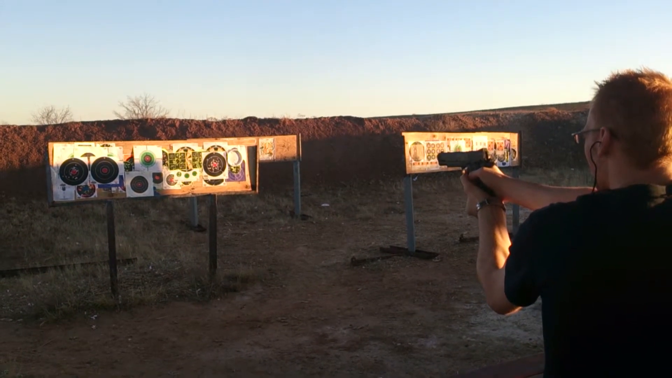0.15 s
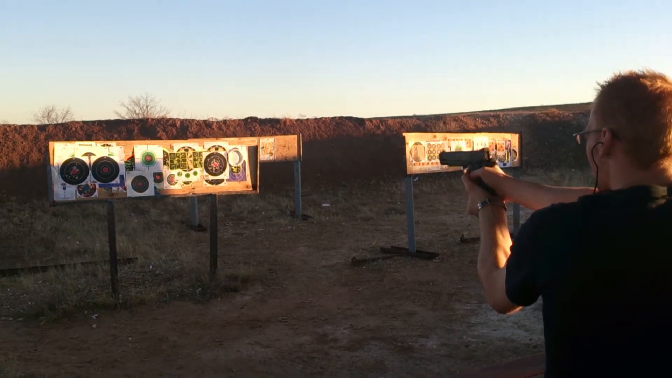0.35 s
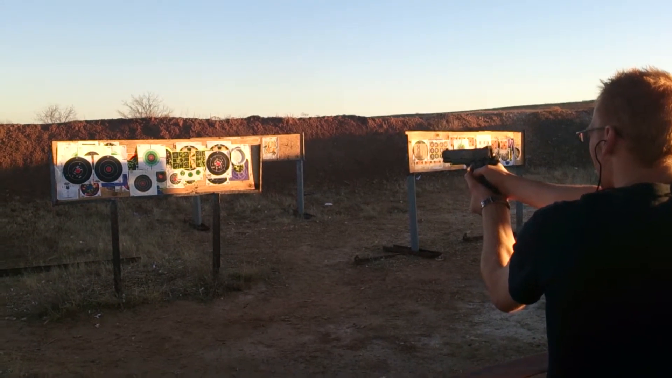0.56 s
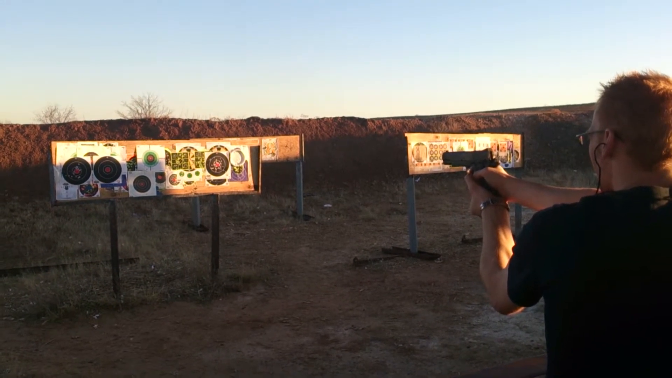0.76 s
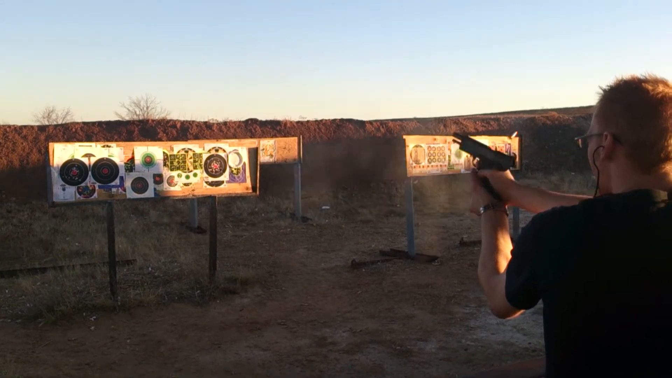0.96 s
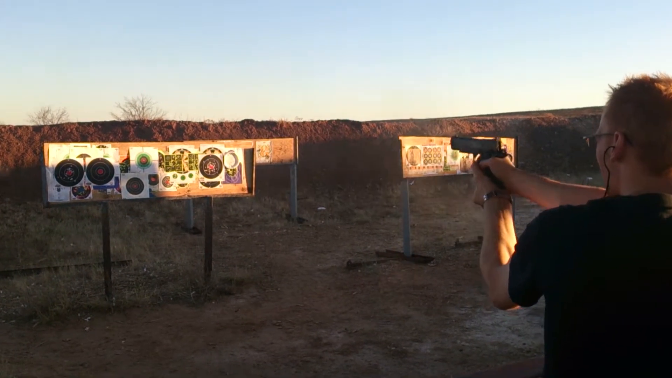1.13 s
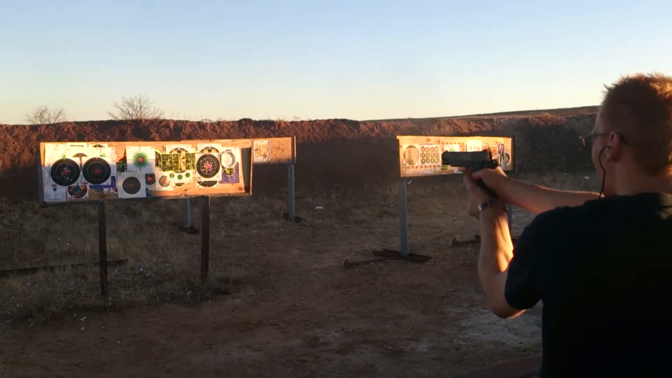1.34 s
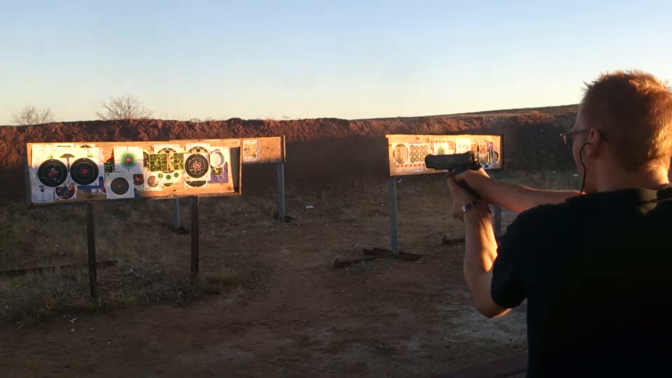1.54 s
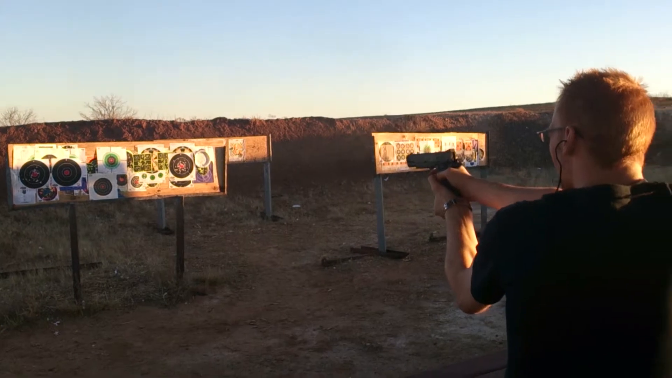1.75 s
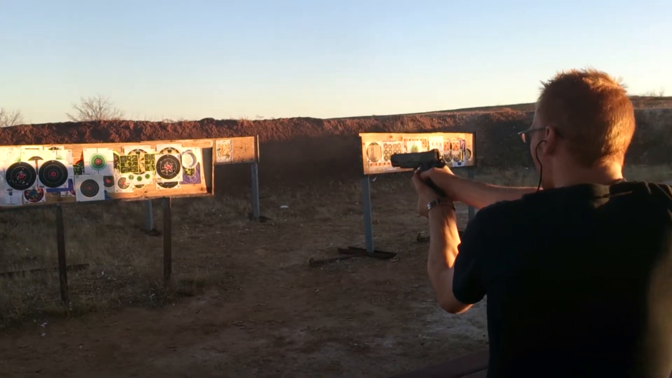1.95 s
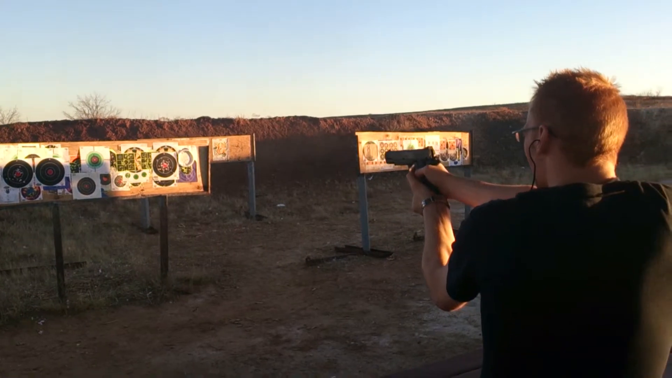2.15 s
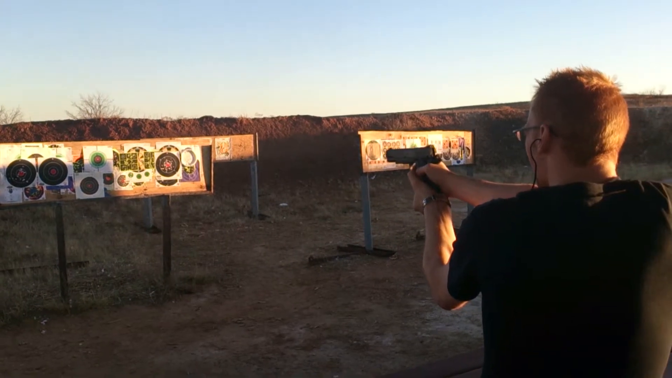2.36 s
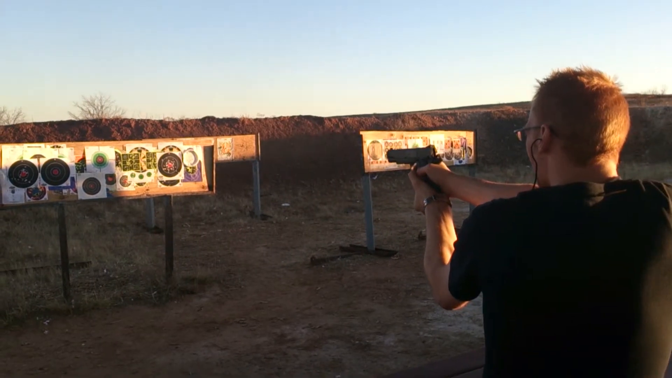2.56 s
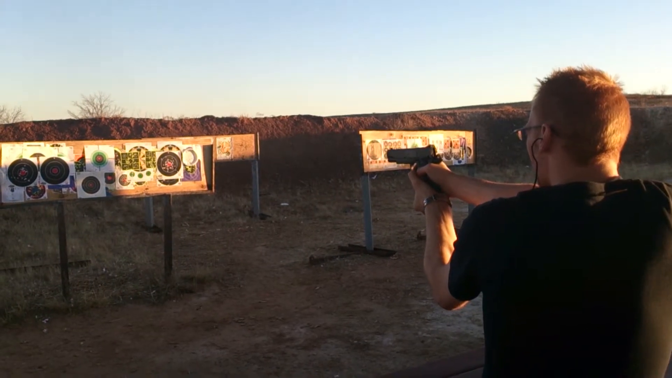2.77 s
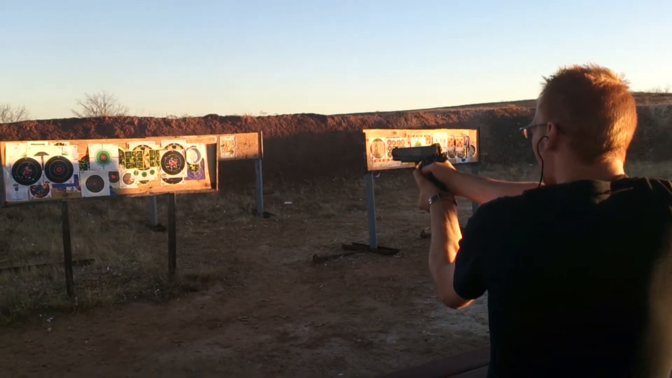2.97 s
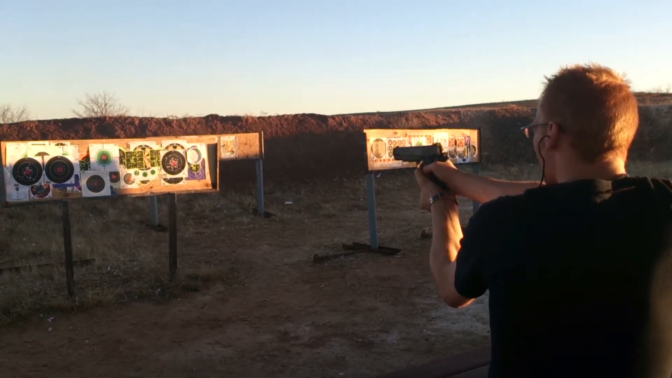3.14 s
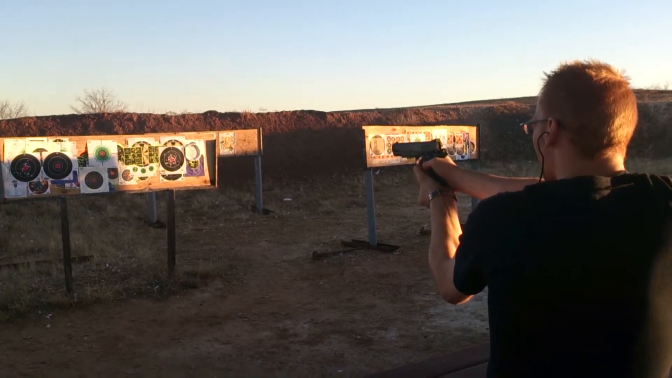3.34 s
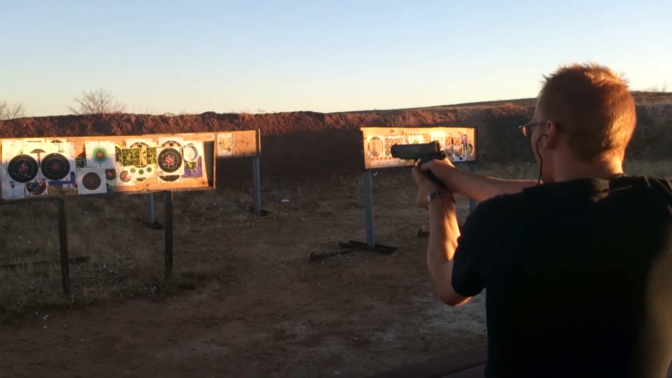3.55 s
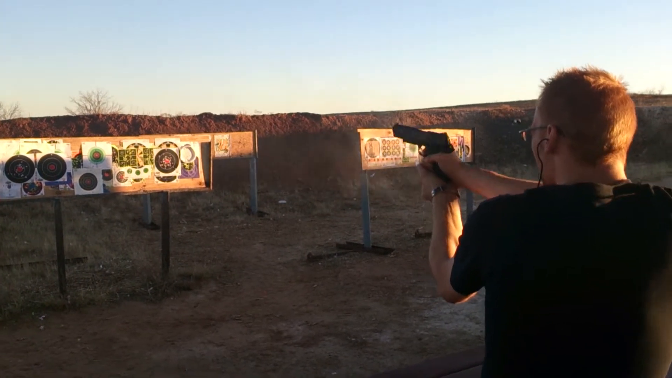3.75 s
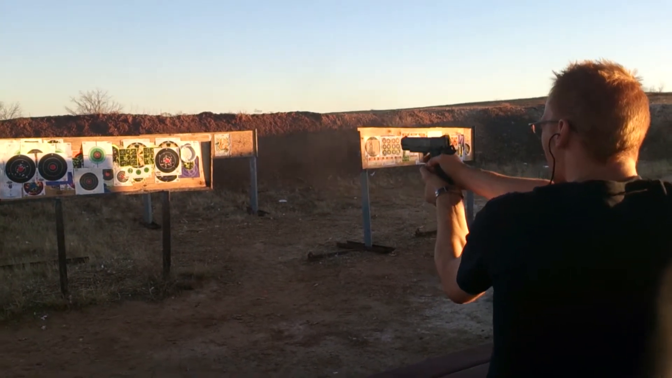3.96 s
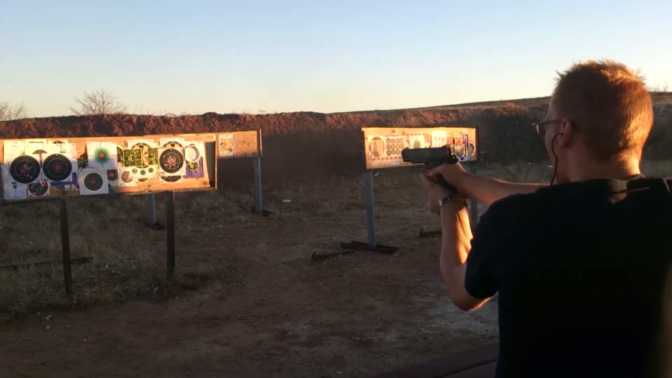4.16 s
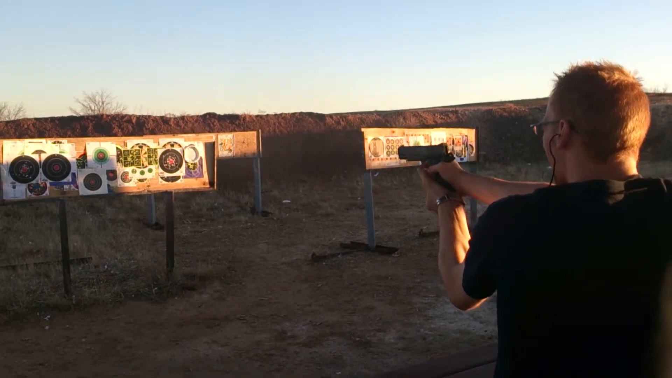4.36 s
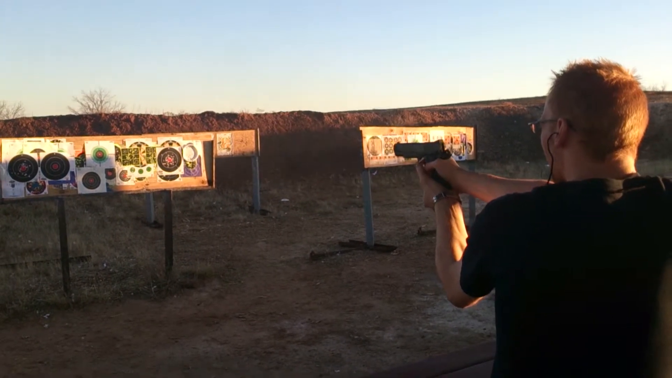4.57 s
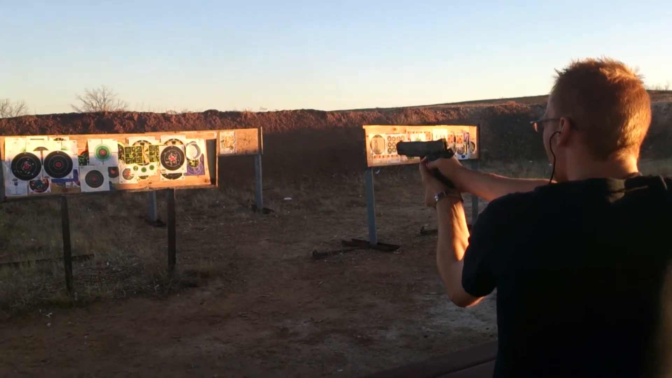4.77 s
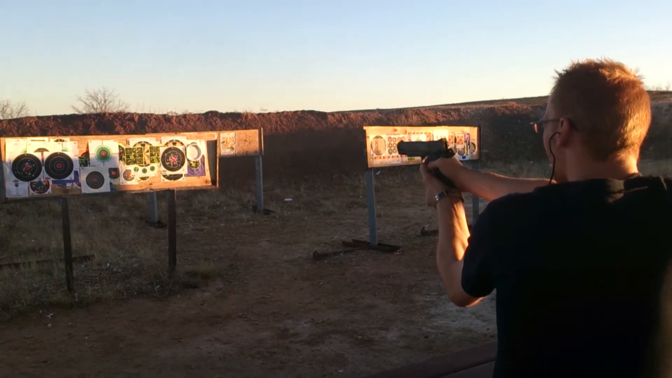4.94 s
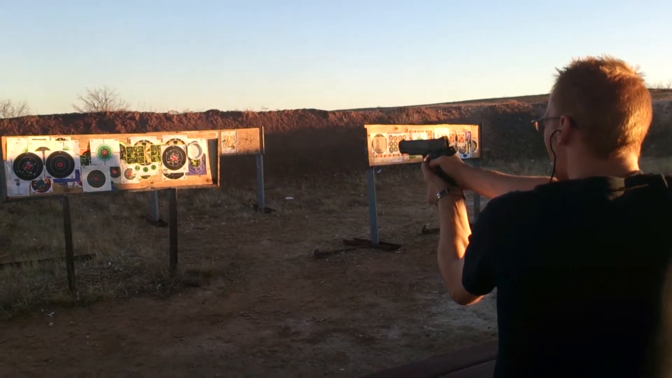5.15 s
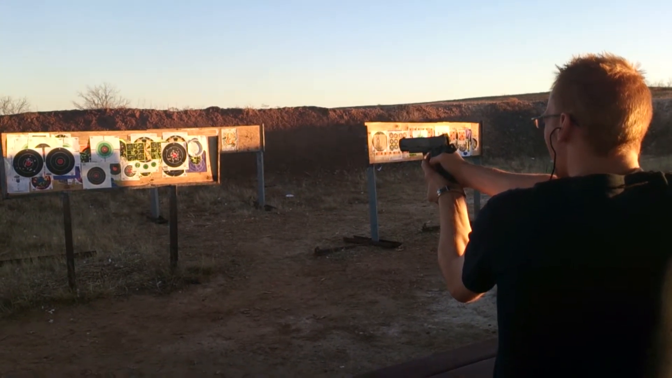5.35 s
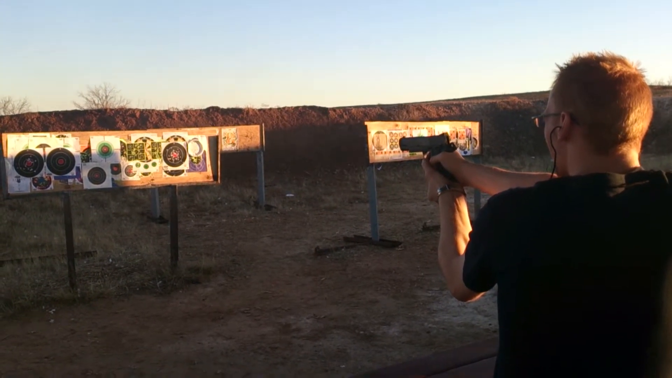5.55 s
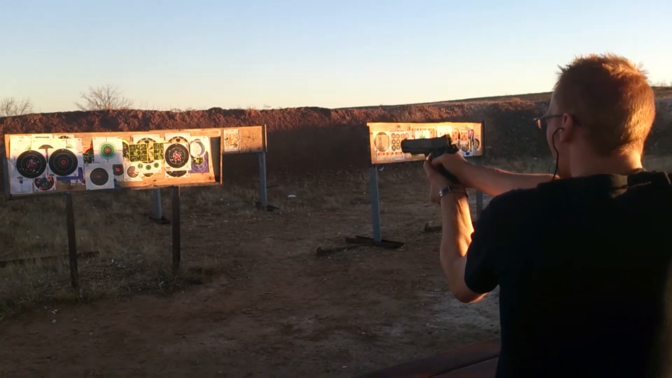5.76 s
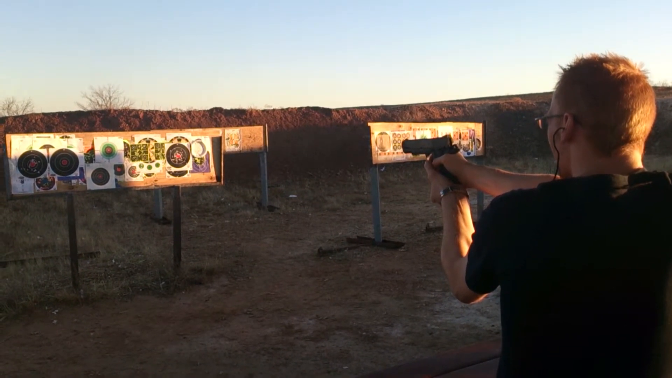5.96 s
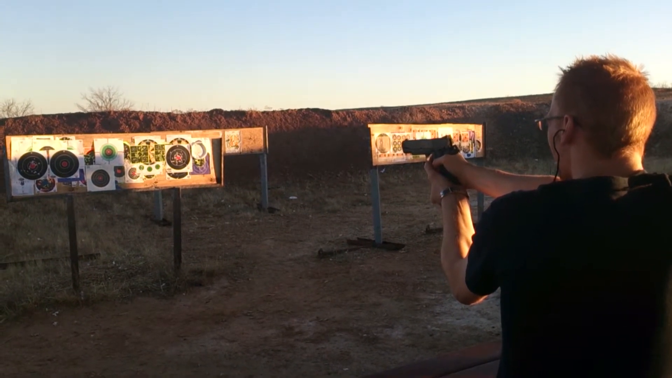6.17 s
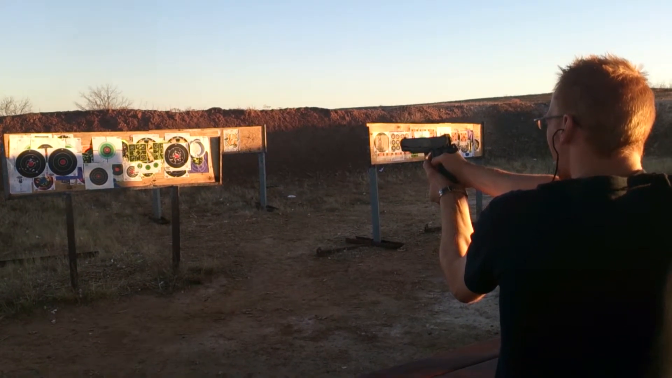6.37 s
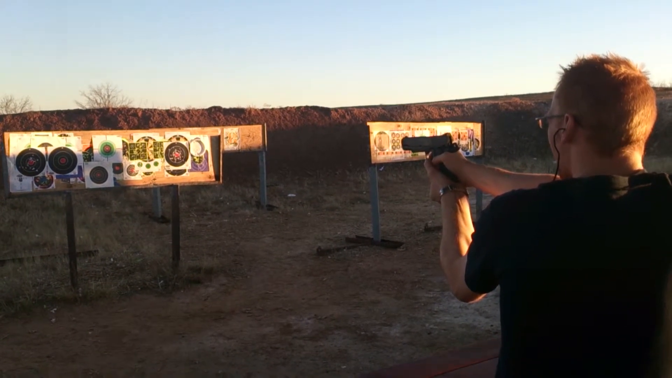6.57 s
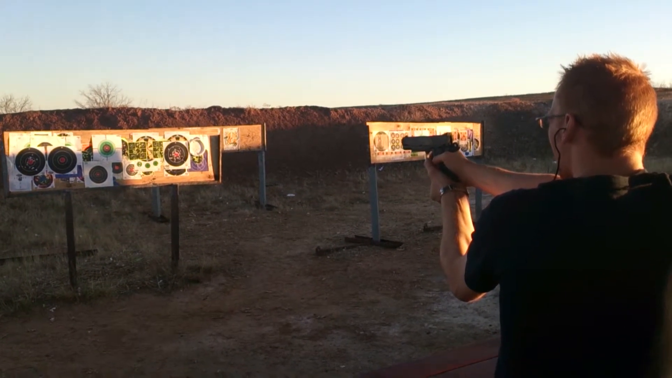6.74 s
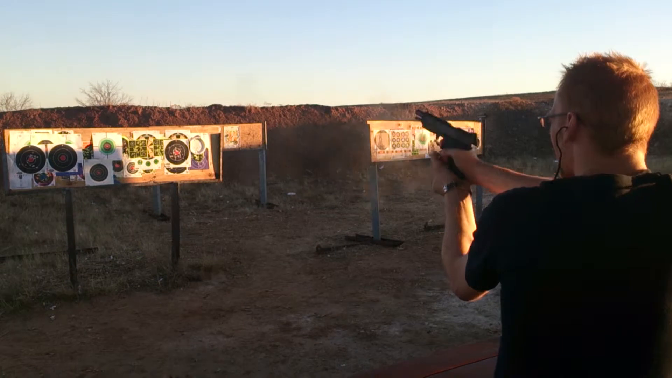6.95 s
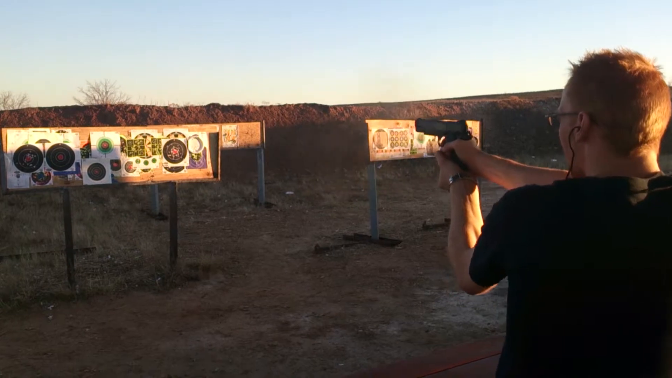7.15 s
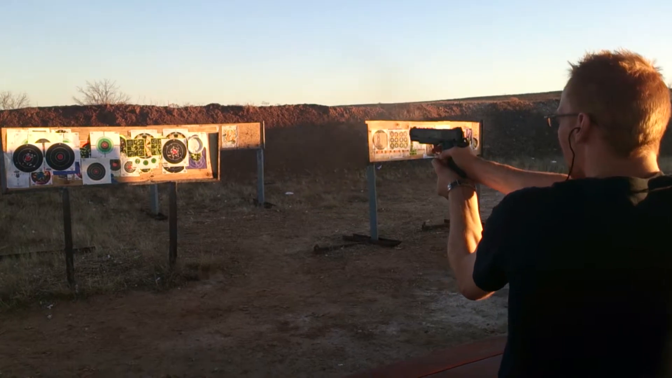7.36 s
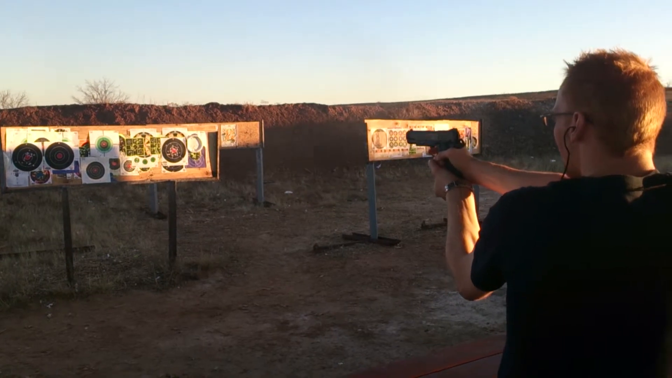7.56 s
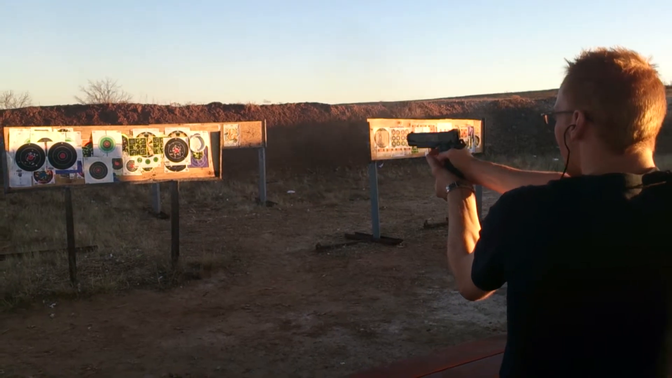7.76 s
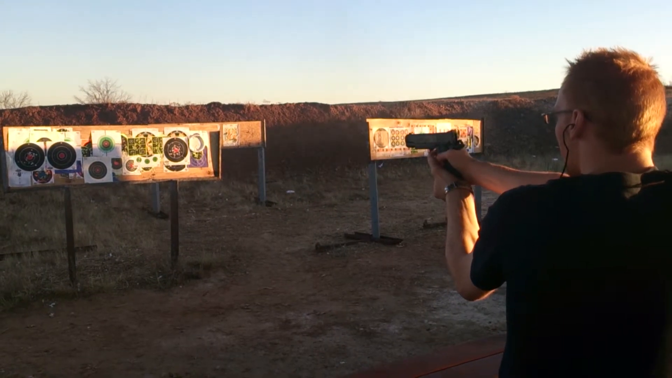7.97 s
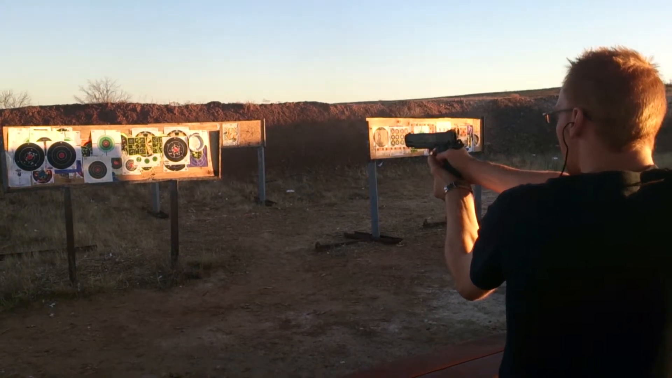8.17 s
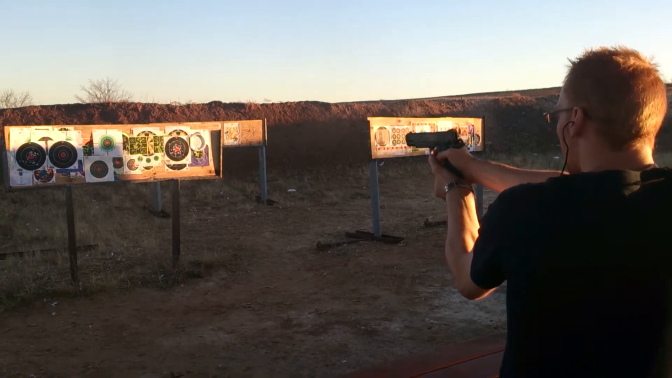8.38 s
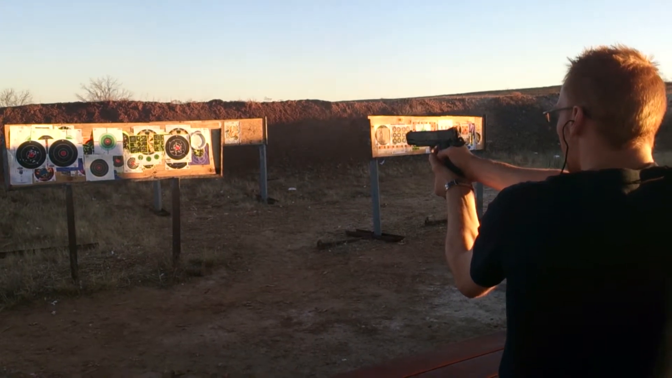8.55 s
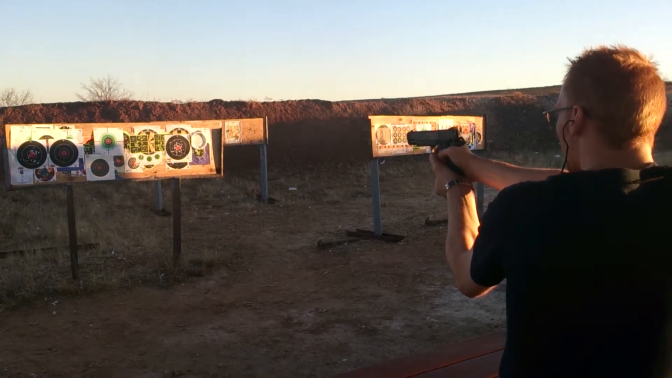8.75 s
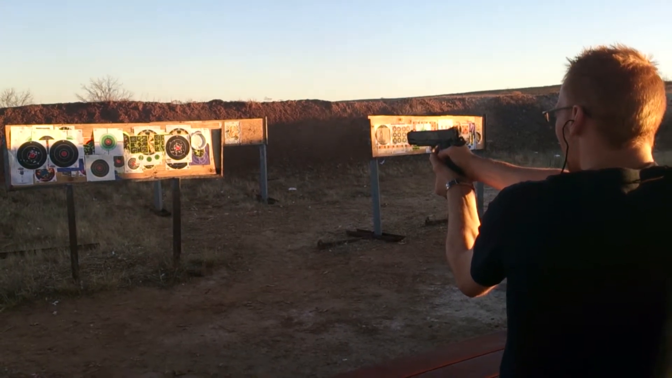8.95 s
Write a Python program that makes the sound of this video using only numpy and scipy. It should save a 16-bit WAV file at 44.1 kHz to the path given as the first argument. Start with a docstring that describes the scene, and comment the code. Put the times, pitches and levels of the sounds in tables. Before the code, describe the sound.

Slow close pistol blasts roll off banks and hills, spent cases tick and ring on hard floor, while fainter shots ping a steel plate.

```python
"""An outdoor shooting range with a roof: three pistol shots overload a phone just behind the shooter.
Each shot is shaped noise with fading tones for the shelter; roof, banks and berms roll it back.
Spent cases tick and ring as they bounce. Down the line a second gun fires four times and rings a steel plate.
Small metal things click, clothes rustle, and the hand on the phone makes small bumps.
The phone's two microphones hiss and are wired in opposite polarity."""
import sys
import numpy as np
from scipy import signal
from scipy.fft import rfft, irfft, next_fast_len
from scipy.io import wavfile

SR = 44100
rng = np.random.default_rng(int(sys.argv[2]) if len(sys.argv) > 2 else 0)


def write(x):
    x = np.atleast_2d(x).T
    wavfile.write(sys.argv[1], SR, np.round(np.clip(x, -1, 1) * 32767).astype(np.int16))


N = 397341  # samples in the whole scene
LENGTH = 110250  # samples in one long sound (2.5 s)
AGE = np.arange(LENGTH) / SR  # seconds since a sound began


def undb(db):
    """Turn decibels into a gain."""
    return 10 ** (np.asarray(db) / 20)


def level(x, db):
    """Set the rms level."""
    return x * undb(db) / np.sqrt(np.mean(x ** 2))


def fade(t60):
    """A smooth fade that falls by 60 dB in t60 seconds."""
    return np.exp(-np.log(1000) * AGE / t60)


def add(out, s, x):
    """Mix a sound in at a time in seconds, cutting what runs past the end."""
    start = max(int(s * SR), 0)
    part = x[..., :out.shape[-1] - start]
    out[:, start:start + part.shape[-1]] += part


def shape(x, gain):
    """Filter by a gain that is a function of frequency."""
    size = next_fast_len(x.shape[-1], True)
    hz = np.maximum(np.fft.rfftfreq(size, 1 / SR), 1)
    return irfft(rfft(x, size) * gain(hz), size)[..., :x.shape[-1]]


def along(hz, points):
    """Read (Hz, value) points on a log-frequency axis."""
    f, value = np.transpose(points)
    return np.interp(np.log(hz), np.log(f), value)


def bell(hz, centre_hz, octaves):
    """A broad resonance with steep skirts."""
    return 1 / (1 + (np.log2(hz / centre_hz) / octaves) ** 2 / 2) ** 2


def wander(rate, size=LENGTH):
    """Straight lines joining random values, `rate` of them a second (at most 200)."""
    steps = np.arange(size) / SR * min(rate, 200)
    return np.interp(steps, np.arange(2000), rng.standard_normal(2000))


SPACING_M = 0.13  # distance between the two microphone ports


def diffuse(size=LENGTH):
    """Noise arriving from all sides at two ports: alike in the bass, unrelated in the treble."""
    likeness = lambda hz: np.sinc(2 * hz * SPACING_M / 343)  # sound travels 343 m/s
    mid = shape(rng.standard_normal(size), lambda hz: np.sqrt(1 + likeness(hz)))
    side = shape(rng.standard_normal(size), lambda hz: np.sqrt(1 - likeness(hz)))
    return np.array([mid + side, mid - side]) / np.sqrt(2)


def decay(noise, table, swell_cycles=0):
    """Fade noise in third-octave bands, each with its own level and t60; a swell is slower in low bands."""
    table, out, age = np.array(table), 0, AGE.astype(np.float32)
    spectrum = rfft(noise.astype(np.float32))
    hz = np.maximum(np.fft.rfftfreq(LENGTH, 1 / SR), 1).astype(np.float32)
    for centre in (25 * 2 ** (np.arange(29) / 3)).tolist():
        # neighbouring bands overlap smoothly
        octaves_away = np.abs(np.log2(hz / centre))
        window = np.cos(np.pi / 2 * np.minimum(3 * octaves_away, 1)) ** 2
        # from level per octave to a gain for white noise
        gain = undb(along(centre, table[:, :2])) * np.sqrt(SR / 2 / centre / np.log(2))
        t60 = along(centre, table[:, ::2])
        envelope = float(gain) * np.exp(-age * float(np.log(1000) / t60))
        if swell_cycles:
            envelope *= 1 - np.exp(-age * float(max(centre, 250) / swell_cycles))
        out = out + irfft(spectrum * window, LENGTH) * envelope
    return out


def modes(rows):
    """Fading pure tones of a ringing body, met at a random phase by each port."""
    turn = rng.uniform(0, 2 * np.pi, (len(rows), 2, 1))
    out = 0
    for (hz, db, t60), phase in zip(rows, turn):
        out = out + undb(db) * fade(t60) * np.sin(2 * np.pi * hz * AGE + phase)
    return out


def tap(centre_hz, octaves, t60, direct_db, size=16384):
    """A sharp contact together with its longer scatter under the roof."""
    noise = level(shape(diffuse(size), lambda hz: bell(hz, centre_hz, octaves)), 0)
    contact = undb(direct_db) * np.exp(-AGE[:size] / 0.012)
    return noise * (contact + fade(t60)[:size])


# the swell and the decay of an echo after 1 s of travel; both grow as the root of the delay
ECHO_SWELL_S, ECHO_T60_S, ECHO_OCTAVES = .03, .62, .68


def echoes(table):
    """Rough surfaces each return a coloured burst; the longer the path, the more it is smeared."""
    out = np.zeros((2, LENGTH))
    for delay, db, centre_hz in table:
        smear = np.sqrt(delay)
        echo = tap(centre_hz, ECHO_OCTAVES, ECHO_T60_S * smear, direct_db=-21.0)
        swell = 1 - np.exp(-AGE[:echo.shape[1]] / (ECHO_SWELL_S * smear))
        add(out, delay, undb(db) * echo * swell)
    return out


# colour of the open air: (frequency [Hz], relative level per hertz [dB])
AIR_COLOUR = [(12, -4), (22, 0.5), (60, -19), (150, -27), (330, -21.5), (520, -25), (750, -33),
              (1400, -34.5), (2200, -42), (5000, -42.5), (8000, -52), (12000, -75.5)]
# colour of the microphone hiss: (frequency [Hz], relative level per hertz [dB])
HISS_COLOUR = [(7000, -25.5), (8800, -21.5), (9800, 0), (11000, -10), (12500, -8), (14500, -4), (15500, -4),
               (16200, -25.5)]


def background():
    """Distant air of unsteady level, a light breeze on the ports, and microphone hiss with a thin whine."""
    air = level(shape(diffuse(N), lambda hz: undb(along(hz, AIR_COLOUR))), -52.5)
    air = air * undb(1.1 * wander(17.0, size=N))
    breeze = shape(rng.standard_normal((2, N)), lambda hz: bell(hz, centre_hz=25, octaves=1.7))
    breeze = level(breeze, -63.5) * undb(2.5 * wander(1.5, size=N))
    hiss = level(shape(rng.standard_normal((2, N)), lambda hz: undb(along(hz, HISS_COLOUR))), -64.0)
    whine = undb(-70.5) * np.sin(2 * np.pi * 9717.5 * np.arange(N) / SR)
    return air + breeze + hiss + whine * np.array([[1], [-1]])


# firmer shifts of the hand at the right port: (time [s], draw level [dB], push level [dB])
HAND_SHIFTS = [(0.638, -48, -37.5), (0.747, -60.5, -40.5), (3.077, -43, -39), (3.487, -44.5, -38),
               (5.32, -40.5, -38), (5.729, -44.5, -46), (6.435, -39.5, -37.5), (6.532, -56, -42),
               (8.551, -55, -38), (8.970, -40, -36.5)]
SHIFT_S, PUFF_S = 0.018, .0036  # from draw to push, and the length of each before filtering
TOUCH_COUNT, TOUCH_DB = 6, -53  # lighter touches, and the upper limit of their level


def grip():
    """Each shift of the hand draws air from the right port and pushes it back; light touches are random."""
    out = np.zeros((2, N))
    puff = signal.lfilter(*signal.butter(1, 14, "high", fs=SR), 1. * (AGE < PUFF_S))
    puff = signal.lfilter(*signal.butter(1, 7000, fs=SR), puff)
    right = out[1:]
    for s, draw_db, push_db in HAND_SHIFTS:
        add(right, s, -undb(draw_db) * puff)
        add(right, s + SHIFT_S, undb(push_db) * puff)
    for when, strength in rng.random((TOUCH_COUNT, 2)):
        add(right, when * N / SR, undb(TOUCH_DB) * strength * puff)
    return out


# small metallic clicks of gun parts, a landing case or loose things on the bench:
# (time [s], level [dB], centre [Hz])
METAL_CLICKS = [(0.667, -45, 1320), (3.3341, -44.5, 5100), (8.216, -59, 2200), (8.303, -46, 1810),
                (8.396, -43, 5380)]
CLICK_OCTAVES, CLICK_T60_S = 0.99, .26
# metal tones that ring with each click: (multiple of its centre, level relative to it [dB], t60 [s])
METAL_TONES = [(.485, -10, .1), (.53, -6.5, .1), (1.02, -10, .17), (1.08, -5, 0.19)]
# hollow knocks: (time [s], level [dB], centre [Hz])
HOLLOW_KNOCKS = [(.668, -38, 724), (6.732, -41.5, 205)]
KNOCK_OCTAVES, KNOCK_T60_S = 0.17, .12
# soft rustles of the shooter's stance, timed at their peak: (time [s], level before the fades [dB])
STANCE_RUSTLES = [(2.324, -61.5), (6.227, -51.5), (6.606, -58.5)]
RUSTLE_S, RUSTLE_HZ = .04, 2590  # time scale of the rise and fall, and centre of the noise


def clicks_knocks_and_rustles():
    """Small metal things click and ring, something hollow is knocked, clothes rustle as swelling noise."""
    out = np.zeros((2, N))
    for s, db, centre_hz in METAL_CLICKS:
        add(out, s, undb(db) * tap(centre_hz, CLICK_OCTAVES, CLICK_T60_S, direct_db=-27))
        tones = [(centre_hz * multiple, tone_db, t60) for multiple, tone_db, t60 in METAL_TONES]
        add(out, s, undb(db) * modes(tones))
    for s, db, centre_hz in HOLLOW_KNOCKS:
        add(out, s, undb(db) * tap(centre_hz, KNOCK_OCTAVES, KNOCK_T60_S, direct_db=-18))
    for s, db in STANCE_RUSTLES:
        rub = level(shape(diffuse(size=16384), lambda hz: bell(hz, RUSTLE_HZ, octaves=1.1)), db)
        rise_and_fall = np.exp(-(AGE[:rub.shape[1]] / RUSTLE_S - 2) ** 2)
        add(out, s - 2 * RUSTLE_S, rub * rise_and_fall)
    return out


# shots of the second gun: (time [s], level [dB])
SECOND_GUN_SHOTS = [(0.9349, -0.5), (2.4417, 0), (4.1424, 0), (5.7905, 0)]
# its crack, scattered along the firing line: (frequency [Hz], level per octave [dB], t60 [s])
SECOND_GUN_CRACK = [(40, -28, 0.25), (153, -30, 0.022), (404, -22, 0.4), (750, -27, 0.25),
                    (1500, -27, 0.14), (2430, -26.5, 0.099), (4030, -35.5, 0.33), (6950, -33.5, 0.13),
                    (10850, -34.5, .09), (15870, -44, .08)]
# its returns from walls, berms and hills: (delay [s], level [dB], centre [Hz])
SECOND_GUN_ECHOES = [(.061, -26, 1500), (.07, -28.5, 150), (.083, -27, 800), (.115, -33.5, 2305),
                     (.18, -34.5, 2600), (.215, -37, 528.5), (.228, -32.5, 1250), (.41, -45, 1400),
                     (.522, -45.5, 1200), (.645, -49, 450), (.71, -50.5, 1176)]
# one flat wall returns a sharp slap
SLAP_DELAY_S, SLAP_DB, SLAP_HZ, SLAP_T60_S = .2125, -29.5, 1320, 0.035
# the long roll from berms and hills, also used by the pistol:
# (frequency [Hz], relative level per octave [dB], t60 [s])
BERM_ROLL = [(30, -39.5, 2.5), (105, -31, 2.6), (208, -24.5, 2.4), (272, -19, 2.8), (375, -24.5, 2.7),
             (514, -15.5, 2.23), (890, -22, 2.085), (1540, -12.5, 1.59), (2370, -28.5, 1.4),
             (4230, -25.5, 1.1), (7000, -35, 0.94), (16000, -48, 1)]
# the steel plate it hits: (frequency [Hz], level [dB], t60 [s])
STEEL_PLATE = [(1433, -35, 0.061), (1170, -54.5, 0.41)]


def second_gun():
    """A pressure pulse, a slow swing of air behind it, then scatter, echoes and the plate's late ping."""
    out, pulse_s = np.zeros((2, N)), .0018
    shot = decay(diffuse(), SECOND_GUN_CRACK)
    pulse = (1 - np.exp(-AGE / 0.00016)) * (1 - AGE / pulse_s) * np.exp(-AGE / pulse_s)
    shot -= undb(-6.5) * pulse
    swing = np.sin(2 * np.pi * 70 * AGE) * np.exp(-((AGE - .008) / 0.012) ** 2)
    shot -= undb(-16.5) * swing
    shot += echoes(SECOND_GUN_ECHOES)
    slap = tap(SLAP_HZ, octaves=0.57, t60=SLAP_T60_S, direct_db=-21.0)
    add(shot, SLAP_DELAY_S, undb(SLAP_DB) * slap)
    shot += undb(-24.5) * decay(diffuse(), BERM_ROLL) * (1 - np.exp(-AGE / 0.015))
    ping = modes(STEEL_PLATE) * (1 - np.exp(-(AGE / 0.0077) ** 2))
    add(shot, .963, ping)
    for s, db in SECOND_GUN_SHOTS:
        add(out, s, undb(db) * shot)
    return out


# pistol shots, also used by the thump and the cases: (time [s], level [dB], centre of the thump [Hz])
PISTOL_SHOTS = [(1.031, -1.5, 22.01), (3.7699, -1.5, 45), (7.0142, -1, 50)]
# the muzzle blast with its first reflections: (frequency [Hz], level per octave [dB], t60 [s])
MUZZLE_BLAST = [(40, -16.5, 0.28), (196, -6, 0.37), (1210, 7, 0.11), (4000, 0, 0.09), (8850, 7.5, 0.031),
                (16000, 8, 0.046)]
# reverberation under the roof: (frequency [Hz], level per octave [dB], t60 [s])
ROOF_REVERB = [(30, -27, 0.41), (110, -17.5, 0.18), (250, -2.5, 0.78), (700, -3, 0.58), (1110, -2, 0.68),
               (1580, -2.5, 0.75), (2000, -11, 0.73), (4230, -5, 0.4), (7040, -17, 0.49), (11000, -10, .32),
               (16000, -16, 0.29)]
# resonances of the shelter: (frequency [Hz], relative level [dB], t60 [s])
SHELTER_TONES = [(176.3, -30.5, 1.8), (259.6, -26.5, 2.4), (295, -19.5, 1.6), (682, -2.5, 0.49),
                 (896, -11.5, 0.31), (773.6, -13, 0.96), (1017, -7.5, 0.4), (1078, -14, 0.65),
                 (1185, -10.5, 0.85), (1276, -10, 0.52), (1390, -25, 2.2), (1496, -9.5, 0.96),
                 (1530, -13.5, 1.1), (1735, -12, 0.22), (2306, -22, 0.28)]
# the blast's returns from the backstop and side banks: (delay [s], level [dB], centre [Hz])
BANK_RETURNS = [(.14, -11.5, 380.5), (.175, -17, 1658), (.295, -20, 650), (.43, -48.5, 2967)]


def pistol():
    """Every blast wakes nearly the same reflections; the shooter's sway changes a part of them."""
    out, near_paths, far_paths = np.zeros((2, N)), diffuse(), diffuse()
    sway = .5  # angle that mixes fresh paths into the shared ones [rad]
    same, changed = np.cos(sway), np.sin(sway)
    blast = decay(diffuse(), MUZZLE_BLAST) * (1 - np.exp(-(AGE / 0.0052) ** 2))
    shelter = modes(SHELTER_TONES) * undb(-2.5) * (1 - np.exp(-AGE / .03))
    banks = echoes(BANK_RETURNS)
    terrain = undb(0.5 * wander(66))  # uneven ground returns the sound in lumps
    for s, db, _ in PISTOL_SHOTS:
        roof = decay(same * near_paths + changed * diffuse(), ROOF_REVERB, swell_cycles=28)
        # the target boards throw the blast back
        roof *= 1 + undb(-1.5) * np.exp(-((AGE - .05) / 0.045) ** 2)
        berms = decay(same * far_paths + changed * diffuse(), BERM_ROLL)
        berms = berms * (1 - np.exp(-AGE / 0.052))
        add(out, s, undb(db) * (blast + shelter + banks + terrain * (roof + berms)))
    return out


def overload_thump():
    """Each overloaded microphone recovers with its own short, deep thump."""
    out = np.zeros((2, N))
    rise_and_fall = np.exp(-((AGE - .055) / .05) ** 2)
    for s, db, thump_hz in PISTOL_SHOTS:
        thump = shape(rng.standard_normal((2, LENGTH)), lambda hz: bell(hz, thump_hz, octaves=1.2))
        add(out, s, level(thump, db - 16.5) * rise_and_fall)
    return out


# bounces of the cases, levels before each layer's trim:
# (time [s], tick level [dB], snap level [dB], ring level [dB])
CASE_BOUNCES = [(1.316, -43, -45, -64.5), (1.939, -42, -53.5, -47), (2.032, -54, -56.5, -56),
                (2.69, -69, -74, -62), (2.847, -72.5, -66, -55), (4.0643, -40, -46, -64),
                (4.499, -55, -51.5, -44.5), (4.9754, -48, -58.5, -55), (5.148, -63.5, -61, -47.5),
                (5.221, -61.5, -66, -53), (5.335, -55.5, -66, -54), (7.3642, -42, -48, -70),
                (7.805, -38.5, -34, -35), (8.304, -38.5, -54, -47)]
# ring pitch of the case from each pistol shot: (frequency [Hz])
CASE_PITCHES = [7230, 7070, 7070]
# the tick's centre at a usual snap, and how much harder a snap lifts it by an octave
TICK_HZ, USUAL_SNAP_DB, SNAP_DB_PER_OCTAVE = 3740, -51, 84
# a case striking the floor: (multiple of the tick centre, relative level [dB], t60 [s])
FLOOR_CLINK = [(.86, -7, 0.096), (1, -2, 0.16), (1.08, -11, .19)]
# a ringing brass case: (multiple of the ring pitch, relative level [dB], t60 [s])
BRASS_TONES = [(1, 0, .27), (1.006, -6, .22), (1.678, -6, .18), (1.688, -5, .2)]


def cases():
    """Brass ticks on the hard floor, brighter the harder it snaps, and rings on in the air."""
    out, fired = np.zeros((2, N)), [shot[0] for shot in PISTOL_SHOTS]
    for s, tick_db, snap_db, ring_db in CASE_BOUNCES:
        ring_hz = CASE_PITCHES[np.searchsorted(fired, s) - 1]  # the case of the latest shot
        tick_hz = TICK_HZ * 2 ** ((snap_db - USUAL_SNAP_DB) / SNAP_DB_PER_OCTAVE)
        add(out, s, undb(tick_db - 3.5) * tap(tick_hz, octaves=0.38, t60=0.27, direct_db=2))
        clink = modes([(tick_hz * multiple, db, t60) for multiple, db, t60 in FLOOR_CLINK])
        add(out, s, undb(tick_db - 6.0) * clink)
        add(out, s, undb(snap_db - 1.5) * tap(9100, octaves=1.0, t60=0.2, direct_db=1))
        first_touch = tap(tick_hz, octaves=0.73, t60=0.0074, direct_db=-30)
        add(out, s, undb(tick_db + 10.5) * first_touch)
        ring = modes([(ring_hz * multiple, db, t60) for multiple, db, t60 in BRASS_TONES])
        ring = ring * (1 - np.exp(-AGE / 0.0035))  # the ring starts softly, within a few milliseconds
        tumble = undb(6.4 * wander(68))  # the case tumbles as it rings
        add(out, s, undb(ring_db + 2) * ring * tumble)
    return out


def scene():
    """All sources at the two ports."""
    near = pistol() + overload_thump() + cases()
    return background() + grip() + clicks_knocks_and_rustles() + second_gun() + near


# colour of the microphone ports: (frequency [Hz], level [dB])
PORT_COLOUR = [(20, 2.5), (1500, -1.5), (4500, -1.5), (6300, -4.5), (8200, -5), (9800, 0.5), (15000, -3)]
TOP_HZ = 16100  # a steep filter removes what lies above


def record(dry):
    """The capsules saturate unevenly, ports colour the sound, the converter clips; right is inverted."""
    headroom, lopsided, ceiling = 1.25, .04, .95
    wired = dry * np.array([[undb(-0.5)], [-undb(3.5)]])
    bent = np.tanh(wired / headroom)
    saturated = headroom * (bent - lopsided * bent ** 2)
    coloured = shape(saturated, lambda hz: undb(along(hz, PORT_COLOUR)))
    clipped = np.clip(coloured, -ceiling, ceiling)
    return signal.sosfilt(signal.ellip(8, .2, 70, TOP_HZ, fs=SR, output="sos"), clipped)


dry = scene()
out = record(dry)
write(out)
```